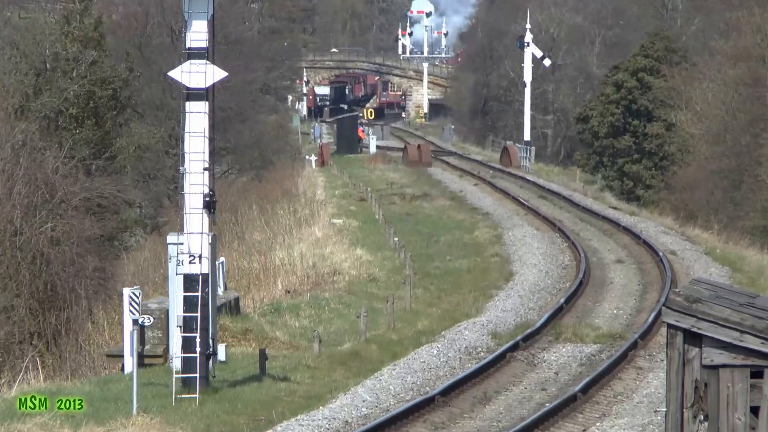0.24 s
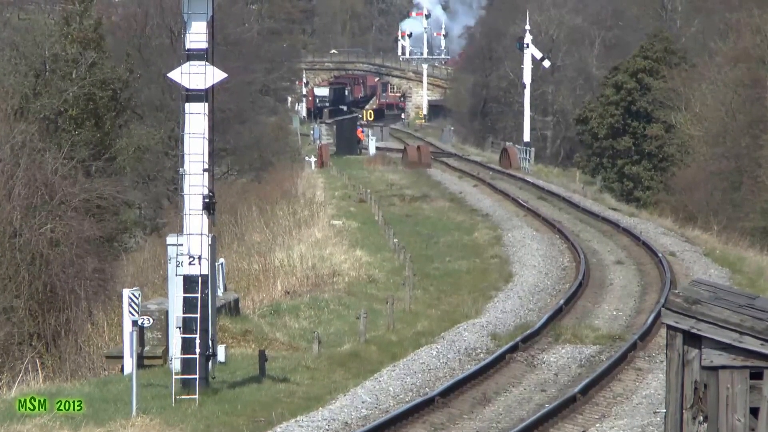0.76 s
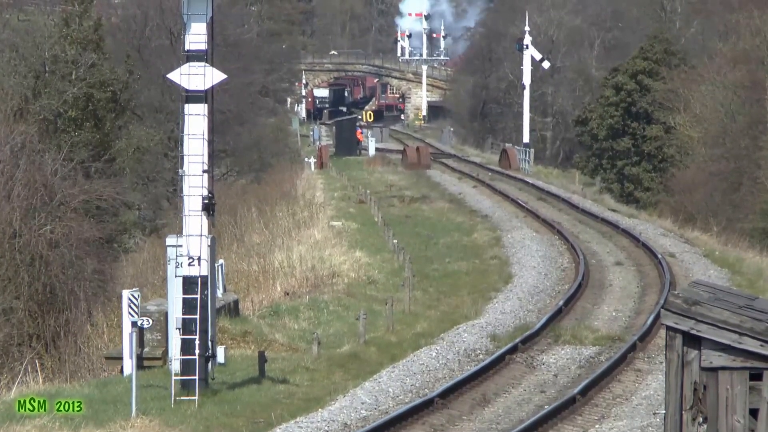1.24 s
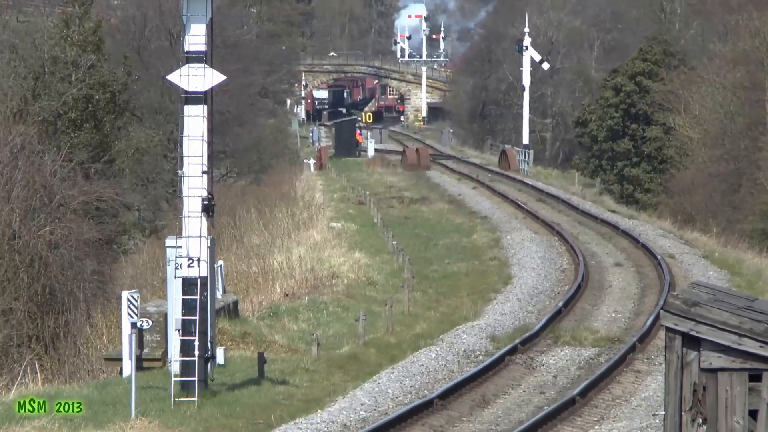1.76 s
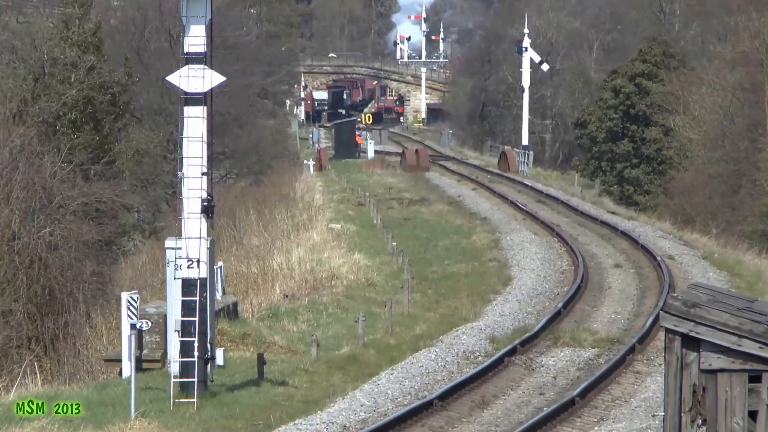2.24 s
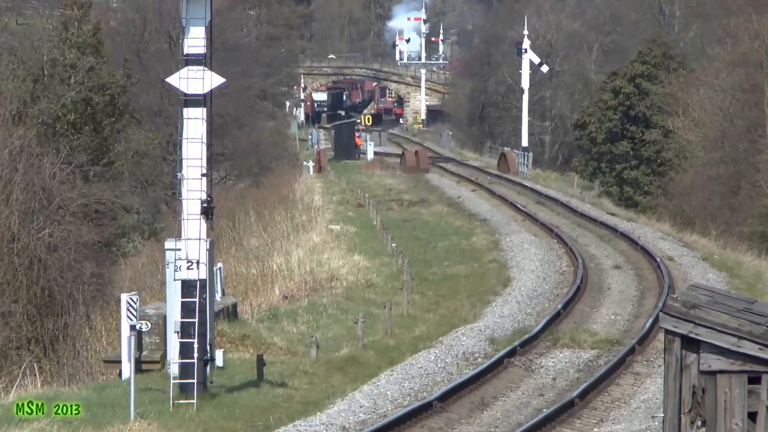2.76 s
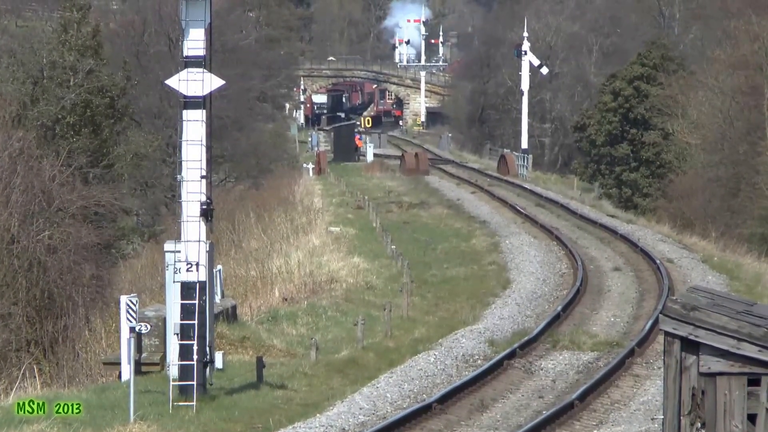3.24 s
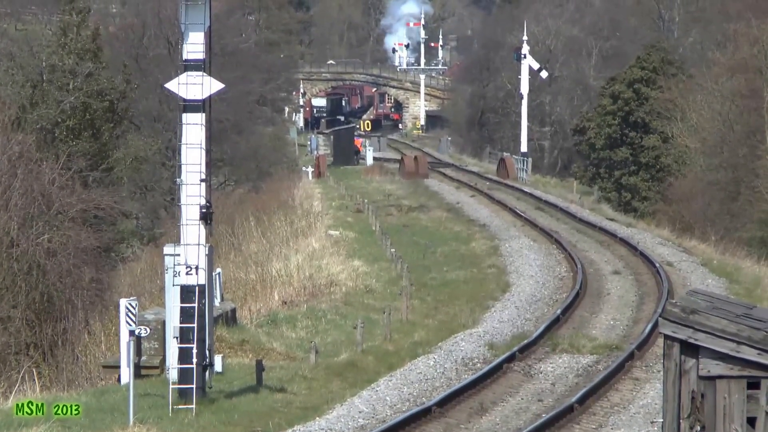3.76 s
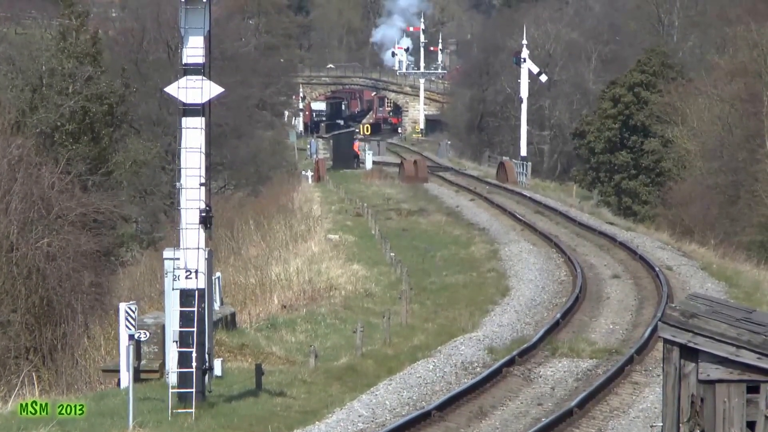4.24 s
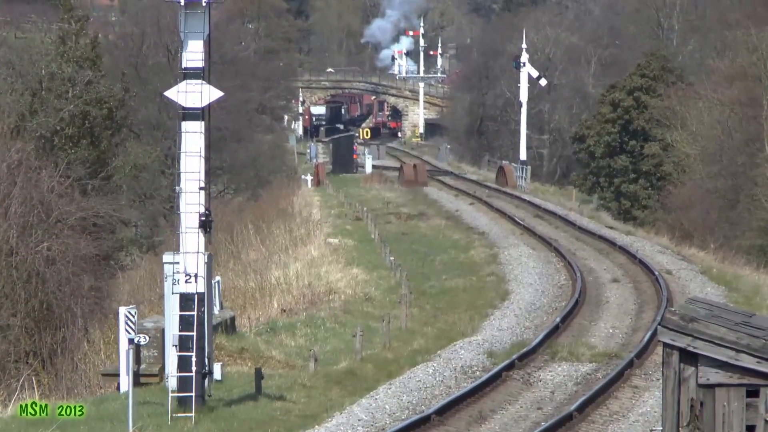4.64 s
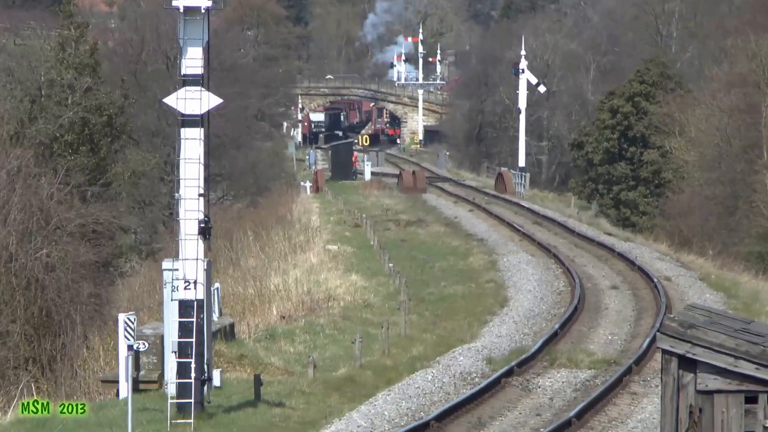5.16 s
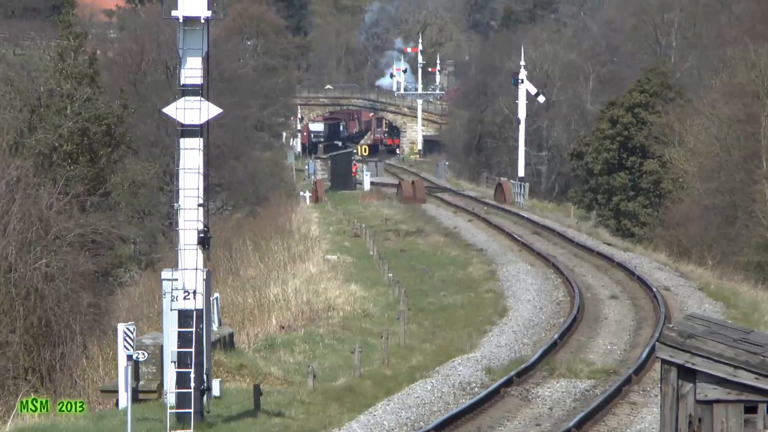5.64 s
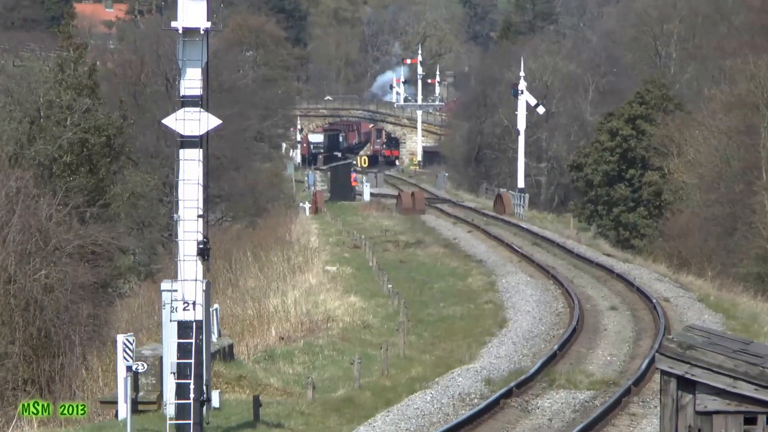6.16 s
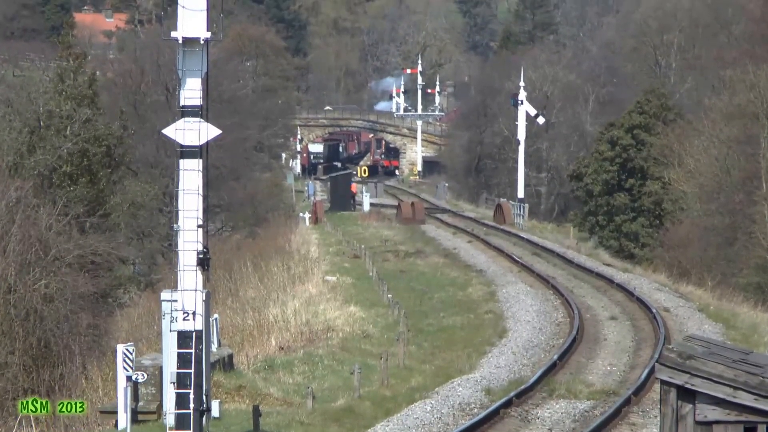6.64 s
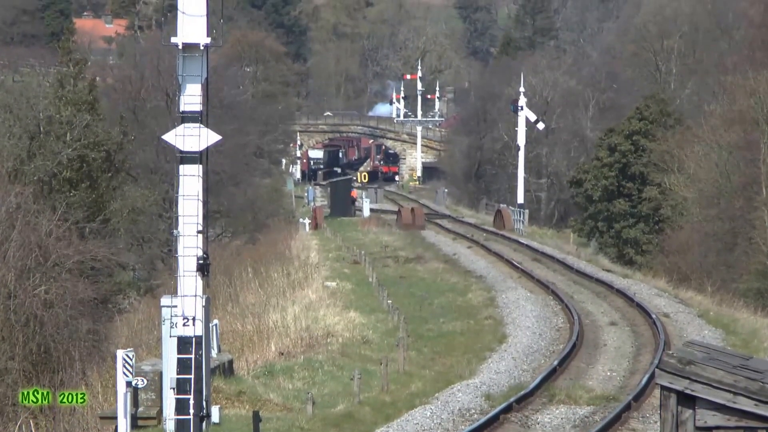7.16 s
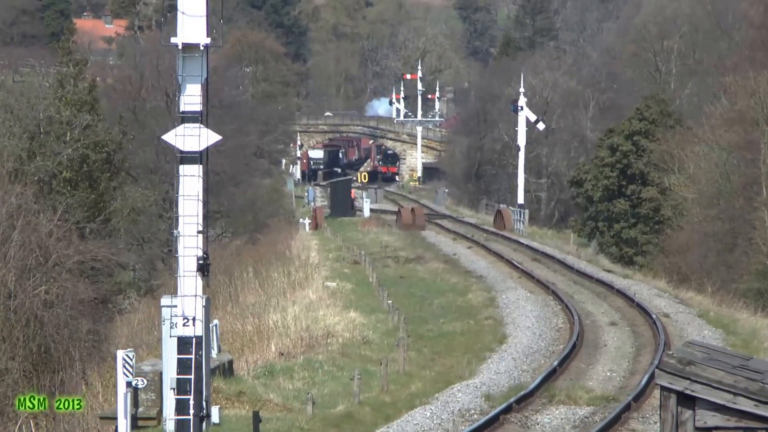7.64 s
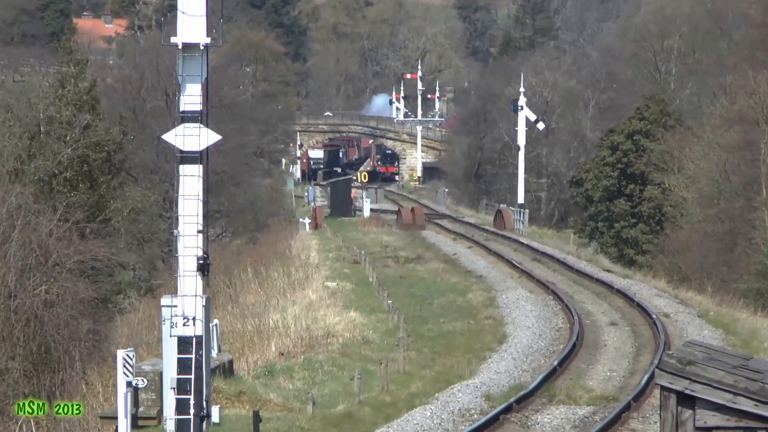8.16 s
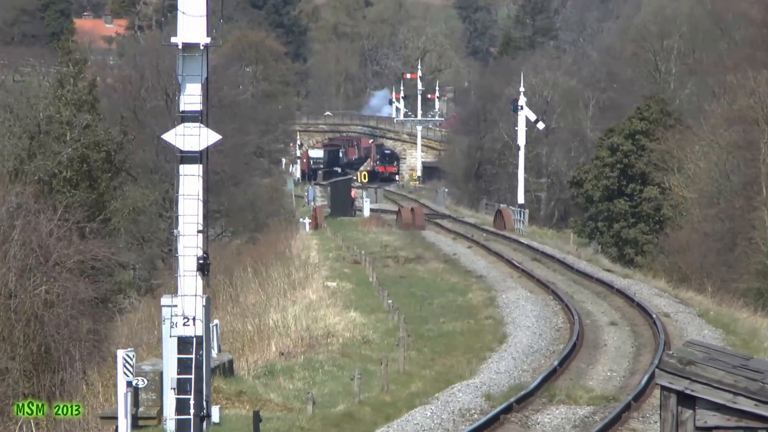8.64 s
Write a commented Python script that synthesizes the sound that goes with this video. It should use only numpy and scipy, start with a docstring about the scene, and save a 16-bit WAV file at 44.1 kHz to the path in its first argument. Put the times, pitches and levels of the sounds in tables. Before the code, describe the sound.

Close, dry handling noise of a hand rubbing and clicking on a camera, growing rougher, over a faint far steam train rush and brief bird chirps.

```python
"""A hand shifts on a camera close by: skin drags and scratches in growing swells, as grainy friction noise.
Finger bumps are soft low pulses; clicks of the mount are noise cracks with short damped modes and chatter.
Behind it, a small bird gives a lone chip and two short runs of gliding tones in the trees.
Far down a wooded line a steam train works: a steady noise rush under a faint, uneven high hiss.
The casing of the microphone colours everything with its peaks and notches."""
import sys
import numpy as np
from scipy import signal
from scipy.fft import rfft, irfft, next_fast_len
from scipy.io import wavfile
from scipy.ndimage import uniform_filter1d

SR = 44100
rng = np.random.default_rng(int(sys.argv[2]) if len(sys.argv) > 2 else 0)


def int16_out(signal):
    """Quantize to a 16-bit WAV file."""
    q = np.round(np.clip(np.atleast_2d(signal).T, -1, 1) * 32767)
    wavfile.write(sys.argv[1], SR, q.astype(np.int16))


N = 392089
TIME = np.arange(N) / SR  # [s]

# All colours are relative spectra; shaped() brings them to an rms of 1.

# hand resting on the casing, never quite still: (time [s], drag level [dB], scratch level [dB])
HAND_CONTACT = [(0, -58, -57), (0.5, -54, -58), (1.0, -56, -56.5), (1.3, -60.5, -54), (1.65, -59, -53.5),
                (2.12, -59, -56), (2.6, -57.5, -51.5), (3.15, -54.5, -61), (3.5, -59.5, -57.5),
                (3.8, -63.5, -63.5), (4.5, -63.5, -60.5), (5.0, -54.5, -57), (6.3, -55, -57.5),
                (8.4, -44.5, -48), (8.89, -64.5, -60.5)]
# separate rubs of the hand: (start [s], length [s], drag level [dB], scratch level [dB])
HAND_RUBS = [(0.14, 0.56, -58, -59), (0.342, 0.082, -61, -53), (0.56, 0.14, -52, -58),
             (0.87, 0.063, -54, -60), (1.289, 0.048, -54, -67), (1.403, 0.14, -51, -55.5),
             (1.527, 0.097, -58, -51.5), (1.723, 0.17, -54, -55), (2.219, 0.08, -50.5, -51),
             (2.395, 0.71, -56.5, -56), (2.497, 0.062, -62, -49), (2.826, 0.06, -53, -53),
             (3.377, 0.073, -57, -74), (3.69, 0.06, -68, -56), (3.831, 0.1, -62, -53.5),
             (4.046, 0.23, -66, -64), (4.237, 0.029, -55, -66), (4.397, 0.056, -76, -60),
             (4.681, 0.22, -50.5, -54), (5.026, 0.59, -54.5, -52), (5.116, 0.022, -40, -42),
             (5.3, 0.34, -47, -49.5), (5.4, 0.077, -46.5, -48), (5.542, 0.2, -52.5, -55),
             (5.731, 0.54, -47.5, -52.5), (5.901, 0.12, -44.5, -46.5), (6.401, 0.11, -51, -56),
             (6.528, 0.15, -44.5, -47.5), (6.685, 0.52, -46.5, -50.5), (6.807, 0.061, -42.5, -44),
             (6.864, 0.1, -44.5, -51), (7.003, .15, -46, -54), (7.27, 0.34, -46.5, -56),
             (7.348, 0.27, -48.5, -47), (7.49, 0.054, -41.5, -46), (7.578, .15, -42, -47),
             (7.617, 0.78, -45, -48.5), (7.72, 0.19, -61, -46), (7.922, 0.041, -38, -43),
             (8, 0.053, -49, -46.5), (8.387, 0.063, -48.5, -49.5), (8.565, 0.23, -50, -55.5),
             (8.852, 0.063, -53.5, -60)]
RUB_RISE, RUB_FALL = 0.15, 0.34  # shares of a rub in which the hand speeds up and slows down
SHORTEST_EDGE_S = .014  # no stroke starts or stops faster
# dull drag of the skin: (frequency [Hz], density [dB per Hz])
DRAG_COLOUR = [(25, -42), (45, -33), (65, -17.5), (90, -8.5), (140, -1), (230, 1.5), (340, -3), (580, -1.5),
               (760, -4), (880, -12), (1300, -13), (2500, -68), (8000, -76)]
# dry scratch of the skin: (frequency [Hz], density [dB per Hz])
SCRATCH_COLOUR = [(200, -53), (700, -12.5), (1000, -12.5), (1350, -5), (1750, -1), (2200, 1), (2750, -3),
                  (4000, -10), (6000, -19.5), (8500, -30.5), (10000, -33.5), (15000, -50)]
# bass of the drag, below BASS_HZ: (time [s], gain [dB])
DRAG_BASS = [(0, -0.5), (1.7, -4.5), (2.3, 4), (4.0, 2), (4.4, -7), (5.2, 5), (6.0, 1.5), (8.0, 0),
             (8.89, 1)]
BASS_HZ = 162
# hoarser rasp of the palm pressing hard: (time [s], level [dB])
PALM_PRESS = [(6.4, -85), (6.6, -58), (7.1, -55.5), (7.248, -70), (7.5, -53), (7.85, -48.5), (8.15, -46.5),
              (8.4, -57), (8.6, -85)]
# hollow colour of that rasp: (frequency [Hz], density [dB per Hz])
RASP_COLOUR = [(300, -37), (750, -7), (1100, -4.5), (1450, -0.5), (2100, -1.5), (2700, -19), (6000, -63)]
# under a press the palm sticks and slips almost regularly: mean rate, rms share it wanders, swing at full press
JUDDER_HZ, JUDDER_WANDER, JUDDER_DB = 27, .2, 1.8
# small ticks of the mount under a rub: rate, smallest level against the scratch, spread of the sizes
TICKS_PER_S, TICK_DB, TICK_SPREAD_DB = 14, 4, 0.5
TICK_HZ, TICK_T60_S = 1840, 0.022

# light, quick brushes of a fingertip: (start [s], length [s], level [dB])
FINGERTIP_BRUSHES = [(0, 0.54, -70.5), (1.2, 0.15, -65), (1.42, 0.77, -62.5), (2.04, 0.71, -59.5),
                     (2.65, 0.44, -62.5), (5.114, 0.019, -45), (5.2, 0.25, -66)]
# hiss of a brush: (frequency [Hz], density [dB per Hz])
BRUSH_HISS = [(1000, -15), (1700, -23), (2400, 6.5), (3100, 2), (4000, -5.5), (5300, 3), (6800, -2),
              (8600, -13.5), (10300, -11), (12500, -23), (15000, -31)]
BRUSH_RISE, BRUSH_FALL = 0.067, 0.39  # shares of a brush

# soft bumps of the fingers on the casing:
# (time of peak [s], level [dB], ring [Hz], length [s], hollow knock against the ring [dB])
FINGER_BUMPS = [(1.081, -51, 233, 0.022, -2), (1.144, -50, 304, 0.017, 1), (1.443, -54, 313, 0.038, -1),
                (2.011, -49, 255, .04, -4), (2.216, -41.5, 328, .014, -8), (2.253, -46, 218, 0.041, -4),
                (2.436, -39.5, 193, 0.021, -8.5), (2.524, -47, 230, 0.02, -10),
                (2.583, -46, 263, .022, -12), (2.645, -45, 223, .022, -2), (2.707, -45.5, 300, 0.031, -2),
                (2.855, -48, 238, .022, -11), (2.908, -43.5, 216, 0.013, -15),
                (2.989, -51.5, 280, .024, 4.5), (3.127, -49, 237, .04, -4), (3.15, -45, 241, 0.015, -10),
                (3.7, -40, 197, 0.017, -18), (3.850, -41.5, 219, 0.016, -18),
                (3.984, -44, 195, 0.037, -7.5), (3.999, -47.5, 270, 0.016, -10),
                (5.03, -40.5, 180, .025, -4.5), (5.076, -49, 208, 0.014, -18),
                (5.128, -37.5, 235, 0.025, -11), (5.155, -42, 260, 0.021, -1),
                (5.167, -29, 296, 0.0195, -14), (5.262, -38, 230, .016, 1.5),
                (5.296, -40.5, 203, 0.025, -10), (5.338, -42.5, 170, 0.031, -8),
                (6.828, -38, 194, 0.038, -12), (7.512, -40, 240, 0.015, 7), (8.192, -44, 196, 0.03, -17),
                (8.274, -38, 200, 0.036, -12)]
BUMP_RISE, BUMP_CUT_HZ = .4, 75  # share of a bump before its peak; bass below the cut is thinned
HOLLOW_HZ, BUMP_RATTLE, KNOCK_RATTLE = 540, .24, .45  # hollow of the casing; roughness of ring and knock

# clicks of the mount: (time [s], level [dB], own ring [Hz], ring t60 [s], upper mode against own ring [dB])
MOUNT_CLICKS = [(1.112, -52, 5400, .011, -12), (1.183, -48, 3630, .008, 2), (1.2158, -40, 3500, .006, 2),
                (1.2228, -51, 4400, 0.022, 7), (1.238, -50, 3800, 0.024, 8), (1.2480, -54, 3430, 0.033, 8),
                (1.341, -44, 2500, 0.02, -5), (1.371, -46, 2300, .02, -14), (1.3825, -39, 2430, 0.019, -13),
                (1.433, -51, 3630, .015, -2), (1.576, -47, 2600, 0.0055, -7),
                (1.5992, -36, 2200, 0.0074, -12), (1.639, -42, 2030, .012, -13),
                (1.6659, -28, 2370, .0042, -24), (1.7050, -21, 2200, 0.0058, -33),
                (2.088, -42, 1980, 0.017, -13), (2.151, -40, 2500, 0.011, -11),
                (2.2633, -34.5, 1700, 0.018, -16), (2.632, -40, 1960, .012, -7),
                (2.9925, -51, 5900, .008, -14), (3.0446, -32, 1710, 0.02, -20),
                (3.6118, -32.5, 1840, 0.027, -10), (4.1414, -38.5, 1660, 0.023, -25),
                (4.197, -48, 1800, .012, -9), (4.684, -36, 1850, 0.018, -11),
                (5.193, -37.5, 1820, 0.019, -20), (5.716, -54, 2700, 0.022, -1),
                (5.745, -44, 1840, 0.015, -5), (5.863, -36, 1900, 0.0083, -2),
                (5.9150, -38, 1800, .008, -11), (5.951, -37.5, 1700, 0.017, 5),
                (6.053, -45, 2700, 0.027, -10), (6.073, -48.5, 1820, 0.04, 8.5),
                (6.3595, -36.5, 1440, .015, -11), (6.485, -37, 1830, 0.011, -5.5),
                (6.568, -35, 2580, 0.018, -6), (6.582, -38, 1424, 0.039, 0.5),
                (6.597, -36, 2620, 0.021, -13), (6.913, -35, 1800, 0.0086, 3),
                (7.006, -43, 2030, 0.0072, -10), (7.1358, -34, 1740, 0.0084, -3),
                (7.379, -45, 2850, .03, -4), (7.51, -34, 1490, .01, -9), (7.589, -47, 1820, .008, -8),
                (7.6102, -34, 1890, 0.0099, -6), (7.7537, -35, 2040, 0.006, -18),
                (7.9315, -35, 2310, 0.0099, 0), (7.9995, -35.5, 2030, 0.02, 1),
                (8.027, -41, 2280, .014, -5), (8.037, -34, 2080, .012, -3), (8.408, -42, 2010, .012, -4),
                (8.5929, -32, 1610, 0.016, 0.5), (8.7490, -51.5, 2000, .009, 13),
                (8.805, -51, 6900, .03, -20), (8.806, -34, 1600, 0.017, -0.5)]
UPPER_HZ = 2770  # the higher mode of the mount
# crack of first contact: (frequency [Hz], density [dB per Hz])
CRACK_COLOUR = [(40, -60), (300, -15), (1200, 26), (2300, -3), (3600, -15), (5200, -26), (8000, -30),
                (15000, -50)]
HARD_CLICK_DB = -21.5  # click level at which crack and snap have their stated levels
CRACK_DB, CRACK_GROWTH = -13.5, 0.11  # against the click; a softer click loses this many more dB per dB
# loose part chattering on after a click: (frequency [Hz], density [dB per Hz])
CHATTER_COLOUR = [(500, -28), (1200, 2), (2000, 7), (3200, 15), (4500, -22), (8000, -38), (15000, -55)]
CHATTER_DB, CHATTER_LENGTH = -12, 2.9  # against the level and the t60 of the click
# bright snap, strong only in hard clicks: (frequency [Hz], density [dB per Hz])
SNAP_COLOUR = [(3600, -37), (4600, 9), (6200, -6), (7900, -12), (9000, -6), (11500, -21), (14000, -24)]
SNAP_DB, SNAP_GROWTH, SNAP_T60_S = -35.5, 2.7, 0.0073  # level of a hard click's snap; dB per dB of the click

# notes of the bird: (start [s], length [s], start pitch [Hz], end pitch [Hz], level [dB])
BIRD_CHIPS = [(4.252, .018, 4450, 4200, -60), (5.450, .028, 3950, 2450, -43),
              (5.524, .014, 4250, 3750, -54), (5.553, .029, 3980, 2430, -46),
              (5.631, .012, 5050, 3450, -50.5), (5.640, .012, 3400, 4200, -53),
              (5.663, .026, 3900, 2450, -47.5), (5.745, .014, 3950, 3450, -52.5),
              (5.780, .017, 3500, 2450, -48), (5.849, .015, 4250, 3350, -51.5),
              (5.849, .012, 4950, 4550, -56), (5.866, .019, 2400, 2020, -46.5),
              (5.883, .014, 3800, 3150, -49), (5.872, .018, 4600, 4200, -56),
              (5.966, .014, 3400, 3950, -48), (5.994, .016, 3600, 3100, -51),
              (8.712, .018, 4150, 4400, -56), (8.740, .016, 4300, 4600, -58),
              (8.815, .018, 4100, 4400, -56), (8.826, .012, 3700, 3450, -57),
              (8.836, .022, 4450, 5000, -58), (8.840, .016, 4100, 3800, -55)]
CHIP_FLUTTER, CHIP_FLUTTER_S = .013, .001  # rms share by which a pitch trembles, and how briefly

# rush of the far train: (frequency [Hz], density [dB per Hz])
TRAIN_COLOUR = [(25, -41), (60, -8), (130, 7.5), (220, -3.5), (650, 2), (900, 1), (1350, -17.5), (1800, 11),
                (2500, -3.5), (3500, -38), (4300, -9), (5200, -16.5), (8000, -16.5), (15000, -22.5)]
TRAIN_DB = -61
# high hiss: faint steam from the engine, and at 5.25 s probably a rub of the hand: (time [s], level [dB])
HIGH_HISS_LEVEL = [(0, -75), (1.2, -76.5), (2.2, -64), (3.4, -63), (3.9, -59), (4.4, -67), (4.8, -63.5),
                   (5.25, -49.5), (5.7, -66), (6.3, -65), (7.5, -67), (8.89, -60.5)]
# colour of the high hiss: (frequency [Hz], density [dB per Hz])
HIGH_HISS_COLOUR = [(1500, -36), (2500, 1.5), (3100, 1), (3700, -0.5), (4400, -7.5), (5500, -15.5),
                    (9000, -34)]

# peaks and notches of the microphone casing: (frequency [Hz], width [Hz], gain [dB])
CASING_MODES = [(325, 35, 1.5), (400, 33, -9), (560, 70, 1), (650, 20, -6), (700, 25, 2.5), (765, 35, 1.5),
                (870, 50, -1.5), (1108, 28, 3.5), (1180, 26, -4), (1298, 26, -5.5), (1459, 45, 5),
                (1560, 38, -7), (1745, 70, 2)]
EDGE_HZ = 15200  # top of the band


def hand():
    """Skin sticks and slips on the casing; uneven grip shakes drag, scratch and rasp together."""
    s, drag_db, scratch_db = np.transpose(HAND_CONTACT)
    drag_rows = [(start, length, db) for start, length, db, _ in HAND_RUBS]
    scratch_rows = [(start, length, db) for start, length, _, db in HAND_RUBS]
    drag_rubs = strokes(drag_rows, RUB_RISE, RUB_FALL)
    scratch_rubs = strokes(scratch_rows, RUB_RISE, RUB_FALL)
    # the powers of resting contact and rubs add
    drag_gain = np.hypot(gain_of(np.interp(TIME, s, drag_db)), drag_rubs)
    scratch_gain = np.hypot(gain_of(np.interp(TIME, s, scratch_db)), scratch_rubs)

    tremble = waver(38)
    quick_tremble = tremble - uniform_filter1d(tremble, size=SR // 10)
    grip = evened(np.tanh(quick_tremble))

    drag = dragging() * drag_gain * gain_of(1.57 * grip)
    scratch = shaped(slips(per_s=700, spread_db=2.2, share=0.26), SCRATCH_COLOUR)
    scratch = scratch * scratch_gain * gain_of(1.08 * grip)
    rasp = swelling(slips(per_s=890, spread_db=4.5, share=0.23), RASP_COLOUR, PALM_PRESS)
    rasp = rasp * gain_of(2.1 * grip)
    return drag + scratch + rasp + scratch_rubs * ticks()


def dragging():
    """The dull drag of the skin: its bass comes and goes, and it judders while the palm presses."""
    drag = shaped(slips(per_s=380, spread_db=1.3, share=.55), DRAG_COLOUR)
    bass = below(drag, BASS_HZ)
    rebalanced = drag - bass + bass * gain_of(np.interp(TIME, *np.transpose(DRAG_BASS)))
    press = gain_of(np.interp(TIME, *np.transpose(PALM_PRESS)))
    turns = np.cumsum(JUDDER_HZ * (1 + JUDDER_WANDER * waver(8.3))) / SR
    judder_db = JUDDER_DB * np.sqrt(press / press.max()) * np.sin(2 * np.pi * turns)
    return rebalanced * gain_of(judder_db)


def ticks():
    """Small parts slip at random and ring two modes of the mount, at uneven sizes."""
    size = gain_of(TICK_DB + TICK_SPREAD_DB * np.minimum(rng.exponential(1, N), 2))
    impulses = size * (rng.random(N) < TICKS_PER_S / SR)
    tick = sum(ring(hz, TICK_T60_S, rise_s=.0006, rattle=.5) for hz in (TICK_HZ, UPPER_HZ))
    return signal.oaconvolve(impulses, tick)[:N]


def fingertip():
    """A light touch gives only a fine, grainy hiss."""
    hiss = shaped(slips(per_s=1500, spread_db=4.5, share=.4), BRUSH_HISS)
    return hiss * strokes(FINGERTIP_BRUSHES, BRUSH_RISE, BRUSH_FALL) * gain_of(2.3 * waver(21))


def fingers():
    """A soft pad pushes and damps, so a bump swells and dies in a few low cycles, with a hollow knock."""
    out = np.zeros(N)
    for s, db, hz, length, knock_db in FINGER_BUMPS:
        t = np.arange(0, length, 1 / SR)
        peak_s = BUMP_RISE * length
        push = np.sin(np.interp(t, [0, peak_s, length], [0, np.pi / 2, np.pi])) ** 2
        knock = gain_of(knock_db) * rough_tone(HOLLOW_HZ, t, KNOCK_RATTLE)
        bump = push * (rough_tone(hz, t, BUMP_RATTLE) + knock)
        add(out, s - peak_s, gain_of(db) * bump)
    return signal.sosfilt(signal.butter(2, BUMP_CUT_HZ, "highpass", fs=SR, output="sos"), out)


def mount():
    """A click is a brief crack, two modes of the part that slipped, a higher mount mode and a ragged tail."""
    out, t = np.zeros(N), TIME[:512]
    for s, db, hz, t60, upper_db in MOUNT_CLICKS:
        crack = shaped(rng.standard_normal(len(t)), CRACK_COLOUR) * gain_of(-60 * t / t60)
        crack_db = db + CRACK_DB + CRACK_GROWTH * (db - HARD_CLICK_DB)
        add(out, s, gain_of(crack_db) * crack)
        modes = [(hz, 0), (hz * 0.857, -9), (UPPER_HZ * rng.uniform(.98, 1.02), upper_db)]
        for mode_hz, mode_db in modes:
            add(out, s, gain_of(db + mode_db) * ring(mode_hz, t60, rise_s=.0011, rattle=.28))
        add(out, s, gain_of(db + CHATTER_DB) * chatter(CHATTER_LENGTH * t60))
    band_hz = [1150, 8000]  # the clicks keep only this band
    return signal.sosfilt(signal.butter(2, band_hz, "bandpass", fs=SR, output="sos"), out)


def chatter(t60):
    """A dying, wide-band buzz of loose contact."""
    t = TIME[:SR // 8]
    return shaped(rng.standard_normal(len(t)), CHATTER_COLOUR) * gain_of(-60 * t / t60)


def snaps():
    """The bright edge of a click, a noise burst that grows much faster than its ring."""
    out, t = np.zeros(N), TIME[:512]
    for s, db, *_ in MOUNT_CLICKS:
        snap_db = SNAP_DB + SNAP_GROWTH * (db - HARD_CLICK_DB)
        burst = shaped(rng.standard_normal(len(t)), SNAP_COLOUR)
        add(out, s, burst * gain_of(snap_db - 60 * t / SNAP_T60_S))
    return out


def bird():
    """Short, slightly hoarse glides, with a faint scatter from the trees as a dying noise tail."""
    out = np.zeros(N)
    for s, length, start_hz, end_hz, db in BIRD_CHIPS:
        count = int(length * SR)
        flutter = evened(uniform_filter1d(rng.standard_normal(count), size=int(CHIP_FLUTTER_S * SR)))
        hz = np.linspace(start_hz, end_hz, count) * (1 + CHIP_FLUTTER * flutter)
        tone = np.sin(2 * np.pi * np.cumsum(hz) / SR)
        add(out, s, gain_of(db) * signal.windows.tukey(count, .5) * tone)
    t = TIME[:SR // 2]
    trees = rng.standard_normal(len(t)) * gain_of(-60 * t / 0.57)  # t60 of 0.57 s
    scatter = signal.fftconvolve(out, trees / np.linalg.norm(trees))[:N]
    return out + gain_of(-32) * scatter


def train_and_high_hiss():
    """Distance smears exhaust and wheels into one rush; a high hiss, mostly faint steam, flutters above it."""
    rush = gain_of(TRAIN_DB) * shaped(rng.standard_normal(N), TRAIN_COLOUR)
    high_hiss = swelling(rng.standard_normal(N), HIGH_HISS_COLOUR, HIGH_HISS_LEVEL)
    return rush + high_hiss * gain_of(1.0 * waver(28))


def slips(per_s, spread_db, share):
    """Friction: a share of separate slips of uneven size in a wash of countless tiny ones."""
    size = gain_of(spread_db * np.minimum(rng.exponential(1, N), 4))
    separate = size * rng.choice([-1, 1], N) * (rng.random(N) < per_s / SR)
    share = np.clip(share, 0, 1)  # of the power
    return np.sqrt(share) * evened(separate) + np.sqrt(1 - share) * rng.standard_normal(N)


def strokes(rows, rise, fall):
    """Gain of strokes (start [s], length [s], level [dB]) that speed up, hold and slow; powers add."""
    power = np.zeros(N)
    for s, length, db in rows:
        rise_s = max(rise * length, SHORTEST_EDGE_S)
        fall_s = max(fall * length, SHORTEST_EDGE_S)
        speed = np.clip(np.minimum((TIME - s) / rise_s, (s + length - TIME) / fall_s), 0, 1)
        power += (gain_of(db) * speed) ** 2
    return np.sqrt(power)


def ring(hz, t60, rise_s, rattle):
    """One damped mode that builds over a short rise."""
    t = np.arange(int(2 * t60 * SR)) / SR
    swell = (1 - np.exp(-t / rise_s)) * gain_of(-60 * t / t60)
    return swell / swell.max() * rough_tone(hz, t, rattle)


def rough_tone(hz, t, rattle):
    """A vibration at one pitch, roughened by the noise of loose contact around it."""
    grit_colour = [(hz / 10, -50), (hz / 2, -5), (hz, 0), (hz * 2, -13), (hz * 4, -31), (hz * 12, -70)]
    grit = shaped(rng.standard_normal(len(t)), grit_colour)
    return np.sin(2 * np.pi * hz * t) + rattle * grit


def swelling(hiss, colour, curve):
    """A hiss of one colour that follows a level curve."""
    return shaped(hiss, colour) * gain_of(np.interp(TIME, *np.transpose(curve)))


def waver(rate_hz):
    """Smooth random movement of rms 1, mostly slower than the given rate."""
    return evened(below(rng.standard_normal(N), rate_hz))


def shaped(x, spectrum):
    """Filters x by a curve of (frequency [Hz], level [dB]) points, to an rms of 1."""
    hz, db = np.transpose(spectrum)
    size = next_fast_len(len(x))
    bins = np.fft.rfftfreq(size, 1 / SR)
    gain = gain_of(np.interp(np.log(bins + 1), np.log(hz), db))
    return evened(irfft(rfft(x, size) * gain, size)[:len(x)])


def below(x, hz):
    """Keeps mainly what lies under a frequency, without delay."""
    size = next_fast_len(len(x))
    bins = np.fft.rfftfreq(size, 1 / SR)
    return irfft(rfft(x, size) / (1 + (bins / hz) ** 4), size)[:len(x)]


def gain_of(db):
    """Decibels to an amplitude factor."""
    return 10 ** (np.asarray(db) / 20)


def evened(x):
    """Scales to an rms of 1."""
    return x / np.sqrt(np.mean(x ** 2) + 1e-20)


def add(mix, s, sound):
    """Lays a sound into the mix at time s [s]."""
    part = mix[max(round(s * SR), 0):][:len(sound)]
    part += sound[:len(part)]


def scene():
    """The near sounds of the hand, with the bird, the far train and the high hiss behind."""
    near = hand() + fingertip() + fingers() + mount() + snaps()
    return (near + bird() + train_and_high_hiss())[None]


def record(dry):
    """The casing rings causally with its peaks and notches; then the treble ends at the band edge."""
    bins = abs(np.fft.fftfreq(8192, 1 / SR))
    colour_db = sum(db * np.exp(-((bins - hz) / width) ** 2) for hz, width, db in CASING_MODES)
    # minimum phase: the ringing only follows the sound
    spectrum = np.exp(np.conj(signal.hilbert(np.log(gain_of(colour_db)))))
    response = np.fft.ifft(spectrum).real[:len(bins) // 2]
    coloured = signal.oaconvolve(dry, response[None])[:, :N]
    band_limit = signal.firwin(611, EDGE_HZ, window=("kaiser", 9), fs=SR)
    return signal.oaconvolve(coloured, band_limit[None], "same")


dry = scene()
out = record(dry)
int16_out(out)
```